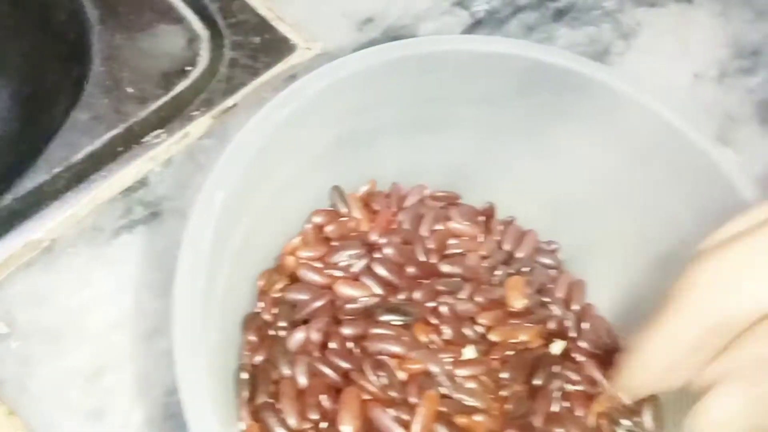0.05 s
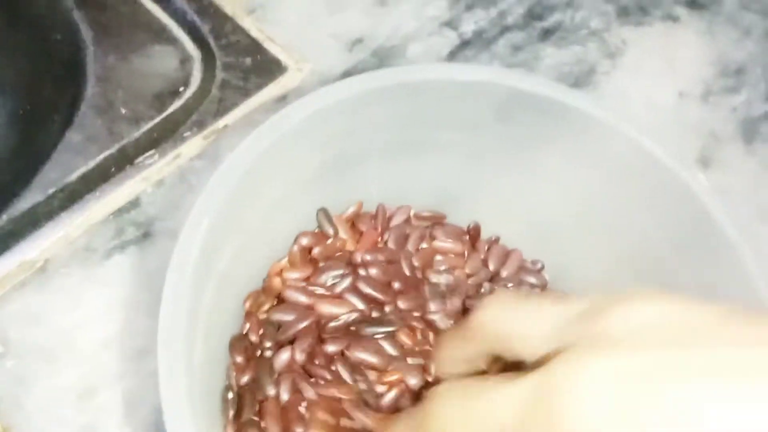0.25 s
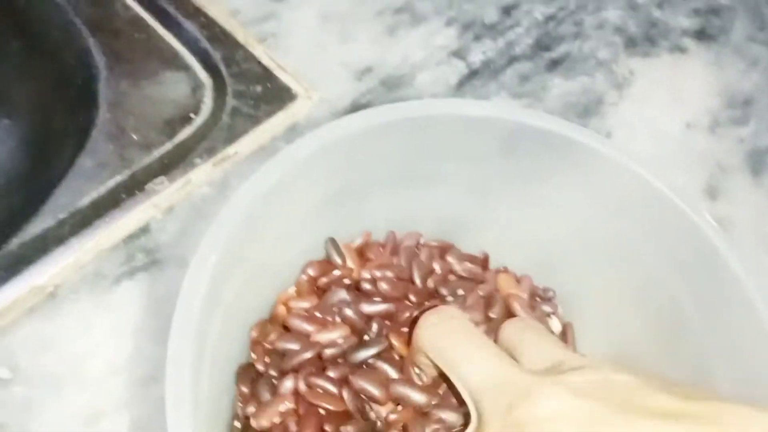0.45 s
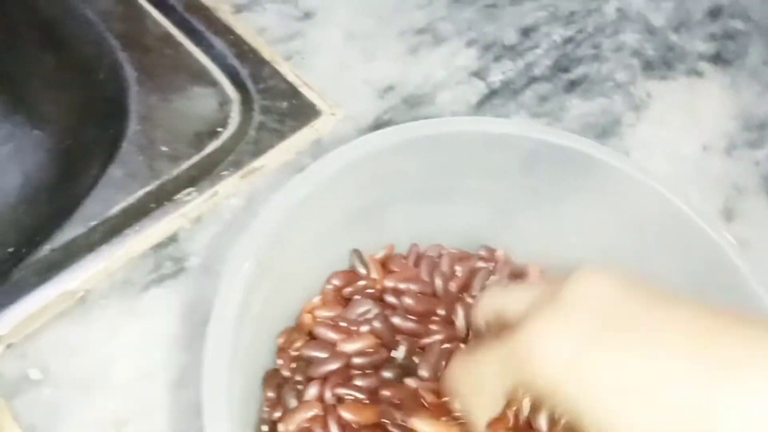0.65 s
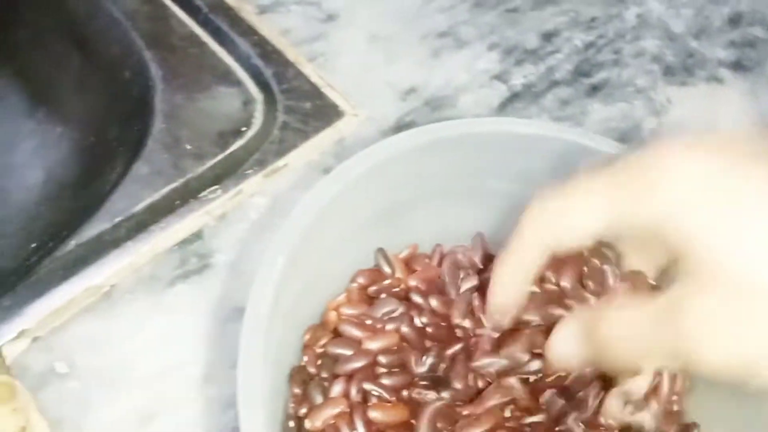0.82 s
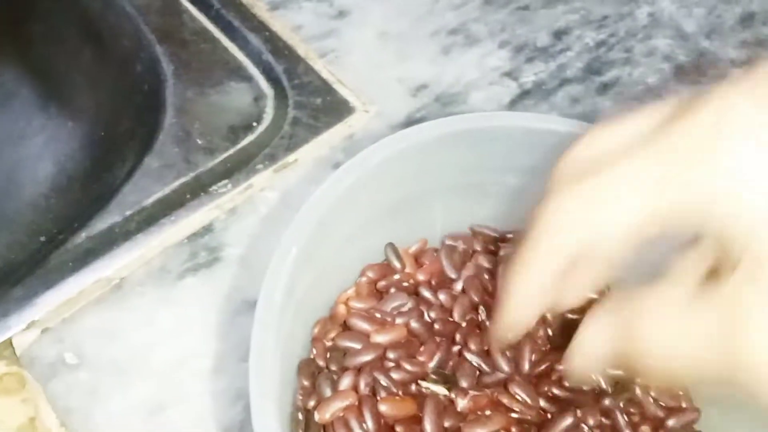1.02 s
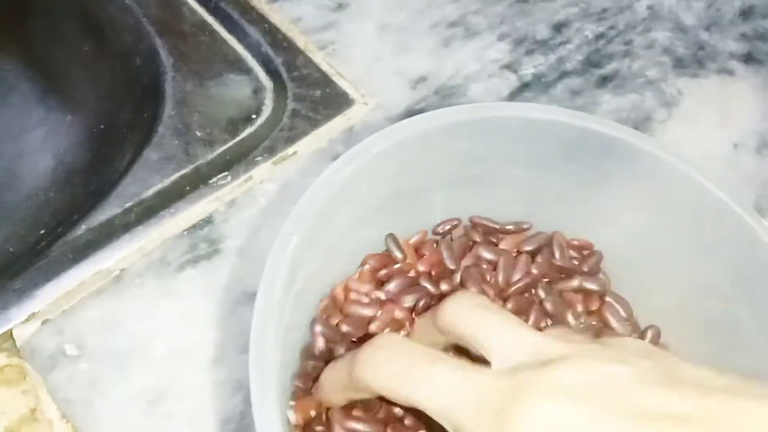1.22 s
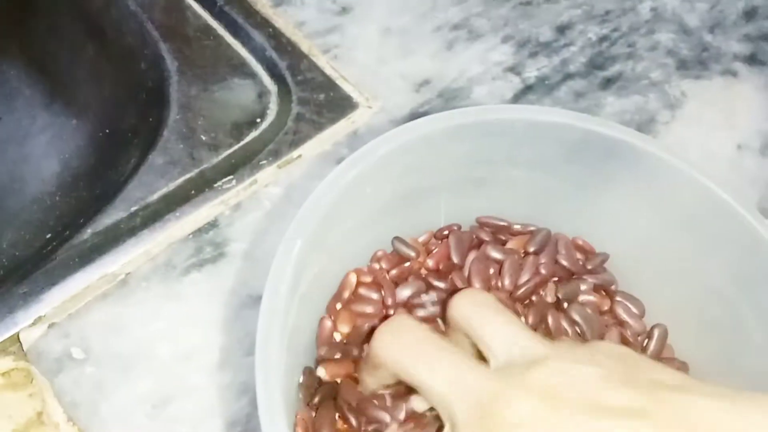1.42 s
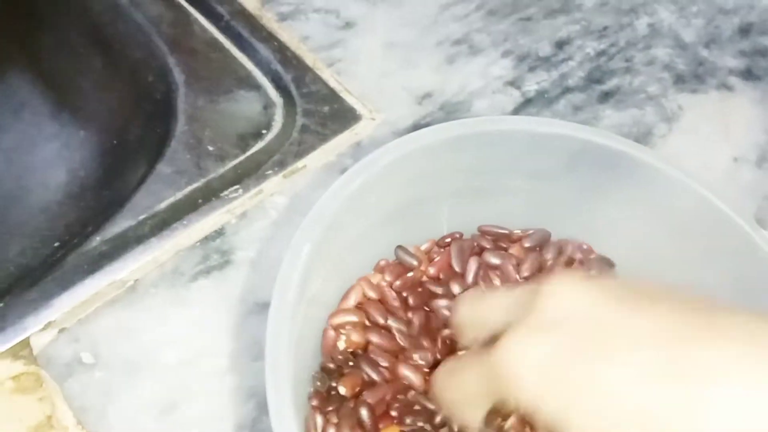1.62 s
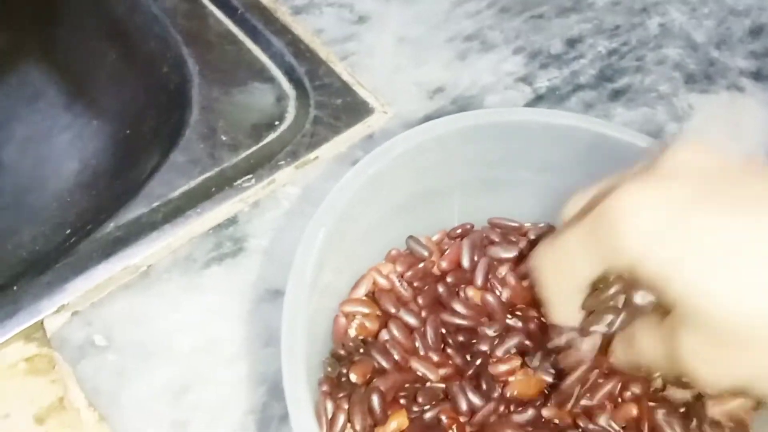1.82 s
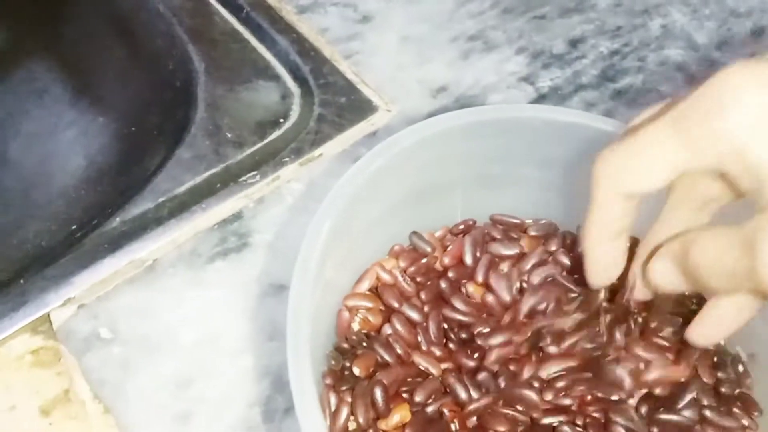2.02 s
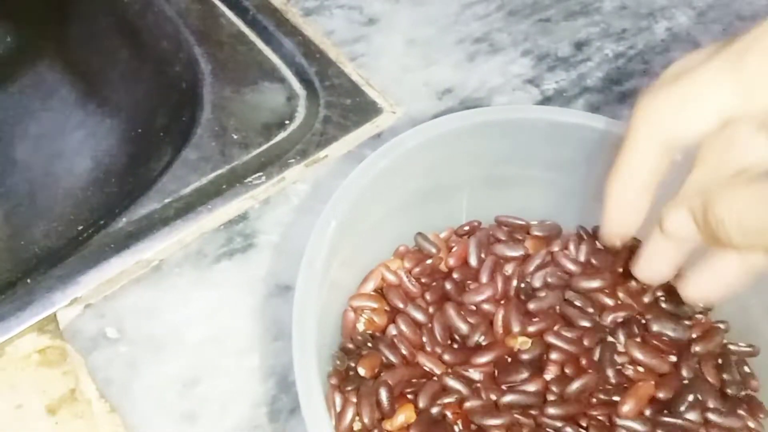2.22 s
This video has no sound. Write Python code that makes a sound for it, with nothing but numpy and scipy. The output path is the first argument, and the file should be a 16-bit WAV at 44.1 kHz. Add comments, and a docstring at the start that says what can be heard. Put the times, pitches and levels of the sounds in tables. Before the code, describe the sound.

Dry beans rattle and clack as a hand stirs them twice round a plastic bowl.

```python
"""Dry beans, stirred by hand twice round a plastic bowl on a stone counter; quiet kitchen, one close mic.
Each contact knocks the bowl wall, rings a bean in two short modes and adds a sharp tick of its skin.
Hundreds of small contacts make the rattle, single hard clacks stand out, and the bowl rumbles softly
on the counter. Behind them are hiss, a low hum, a faint high ring and the short tail of the room."""
import sys
import numpy as np
from scipy import signal
from scipy.fft import rfft, irfft
from scipy.io import wavfile
from scipy.ndimage import uniform_filter1d

SR = 44100
rng = np.random.default_rng(int(sys.argv[2]) if len(sys.argv) > 2 else 0)


def inscribe(sig):
    """Save sig as 16-bit PCM at rate SR to the path in sys.argv[1].

    A 1-D sig is mono; a 2-D sig holds one channel per row.
    Samples are clipped to [-1, 1] before scaling.
    """
    pcm = np.round(np.clip(np.atleast_2d(sig).T, -1, 1) * 32767)
    wavfile.write(sys.argv[1], SR, pcm.astype(np.int16))


N = 103635
TIME = np.arange(N) / SR
RING_T60_S = 0.75

# Tone of the bean bodies and of their skins: frequency_hz, gain_db
BEAN_TONE = [(900, -31), (1900, -7.5), (2400, -3.5), (3200, 0.5), (4100, -2), (5200, 1), (6800, -0.5),
             (8200, -8.5), (11000, -45), (16000, -39)]
SKIN_TONE = [(4000, -21), (7500, 4), (9000, -0.5), (12000, -1), (15000, 1), (16000, 3.5)]
# Bands of the faint high ring: pitch_hz, width_hz, gain_db
RING_BANDS = [(1174, 61, -9.5), (1414, 61, -6.5), (2315, 97, 3), (2580, 27, -4), (2900, 96, -3),
              (3290, 120, -17), (3630, 180, -8), (5030, 180, -9), (5510, 190, -7), (6860, 400, -15.5),
              (7700, 300, -20)]


def from_db(db):
    """Decibels to gain."""
    return 10 ** (np.asarray(db) / 20)


def rms_one(x):
    """Scale to rms 1."""
    return x / np.sqrt(np.mean(x ** 2) + 1e-20)


def unit_energy(x):
    """Scale to energy 1."""
    return x / np.sqrt(np.sum(x ** 2) + 1e-20)


def in_time(rows):
    """Each column of a timed curve at every sample."""
    times, *columns = np.transpose(rows)
    return [np.interp(TIME, times, column) for column in columns]


def add(out, start_s, sound):
    """Mix a short sound in at start_s."""
    i = int(start_s * SR)
    out[i:i + len(sound)] += sound[:N - i]


def coloured(x, points, size=4096):
    """Minimum-phase filter through (frequency_hz, gain_db) points."""
    hz, db = np.transpose(points)
    grid_hz = np.maximum(np.arange(size // 2 + 1) * SR / size, 1)
    gain = from_db(np.interp(np.log(grid_hz), np.log(hz), db))
    cepstrum = irfft(np.log(gain))
    cepstrum[1:size // 2] *= 2
    cepstrum[size // 2 + 1:] = 0
    return signal.oaconvolve(x, irfft(np.exp(rfft(cepstrum))))[:len(x)]


def evened(x, window_s=0.056):
    """Hold the running level near 1, keeping the single contacts."""
    width = int(window_s * SR)
    power = uniform_filter1d(uniform_filter1d(x ** 2, width), width)
    return x / np.sqrt(np.abs(power) + np.mean(x ** 2) / 1000)


def background(hum_hz=196, settle=2048):
    """Room hiss, a low hum and a faint ring that dies away at the start."""
    # Tone of the hiss: frequency_hz, gain_db
    hiss_tone = [(30, -20), (200, -11), (600, -20), (2500, -14), (6000, -24), (9000, -21), (16000, -32)]
    ring = np.zeros(N)
    for hz, width_hz, db in RING_BANDS:
        b, a = signal.iirpeak(hz, hz / width_hz, fs=SR)
        noise = rng.standard_normal(N + settle)
        ring += from_db(db) * signal.lfilter(b, a, signal.lfilter(b, a, noise))[settle:]
    hiss = from_db(-65) * rms_one(coloured(rng.standard_normal(N), hiss_tone))
    hum = from_db(-58) * np.sin(2 * np.pi * hum_hz * TIME)
    return hiss + hum + rms_one(ring) * from_db(-51.5 - 60 * TIME / RING_T60_S)


def counter():
    """The bowl rumbles softly as it shifts on the stone."""
    # The bowl shifting on the counter: time_s, relative_db
    shifts = [(0.0, -45.5), (0.03, -64), (0.32, -46.5), (0.44, -67), (0.49, -54), (0.7, -77), (0.74, -41.5),
              (0.84, -61), (0.86, -51), (0.97, -66), (1.05, -44), (1.09, -75), (1.16, -44), (1.41, -47.5),
              (1.45, -36), (1.5, -66), (1.85, -39), (1.92, -57), (2.06, -34), (2.2, -49.5), (2.24, -33),
              (2.35, -54)]
    # Tone of the rumble: frequency_hz, gain_db
    rumble_tone = [(25, -33), (70, -16.5), (95, 3), (118, 2), (150, -13), (250, -17.5), (600, -40)]
    shift_db, = in_time(shifts)
    return from_db(shift_db - 1) * evened(coloured(rng.standard_normal(N), rumble_tone))


def contact(hz, cycles, rebound_db, scatter_s=0.0071):
    """One touch: a sine falling 60 dB over `cycles`, repeated by rebounds and reflections in the bowl."""
    t = TIME[:1024]
    rebounds = rng.standard_normal(len(t)) * np.exp(-(t / scatter_s) ** 2)
    strikes = from_db(rebound_db) * unit_energy(rebounds)
    strikes[0] += 1  # the first touch
    ring = np.sin(2 * np.pi * hz * t) * from_db(-60 * t * hz / cycles)
    return unit_energy(signal.fftconvolve(ring, strikes)[:len(t)])


def patter(clicks, low_hz, high_hz, cycles, spread_db=3, count=80):
    """Each click excites one of many resonances in a range of pitch, with a strength of its own."""
    dealt = rng.integers(0, count, N)
    clicks = clicks * from_db(spread_db * np.clip(rng.standard_normal(N), -2, 2))
    rings = [contact(hz, cycles, rebound_db=0.5) for hz in np.linspace(low_hz, high_hz, count)]
    out = np.zeros(N)
    for i in np.flatnonzero(clicks):
        add(out, i / SR, clicks[i] * rings[dealt[i]])
    return out


def bowl(knocks):
    """The plastic wall: a broad dull knock and the longer rings of its modes."""
    # Modes of the wall: pitch_hz, width_hz, gain_db
    wall_modes = [(690, 14, 8.5), (814, 14, 0), (892, 28, 2), (985, 26, -5), (1230, 84, -3), (1415, 26, -1),
                  (1550, 38, -5.5), (1808, 26, -1.5)]
    # Tone of the wall: frequency_hz, gain_db
    wall_tone = [(120, -47.5), (350, -28), (600, -9.5), (750, -9), (1000, -2.5), (1300, 2.5), (1600, 1),
                 (2000, 1), (2600, -2), (5000, -44.5)]
    rings = sum(from_db(db) * signal.lfilter(*signal.iirpeak(hz, hz / width_hz, fs=SR), knocks)
                for hz, width_hz, db in wall_modes)
    return coloured(knocks + from_db(-2) * rings, wall_tone)


def rattle(start_s=0.148, peak_contacts_per_s=1800, rate_follows=0.4):
    """Random contacts among the beans, more frequent and stronger as the hand moves faster."""
    # Relative levels through the stir: time_s, shuffle_db, knock_db, clack_db, tick_db
    stir = [(0.15, -65, -41.5, -39, -52), (0.17, -50, -36.5, -37.5, -47), (0.2, -39.5, -33, -35, -44),
            (0.23, -37, -29.5, -22, -38), (0.26, -41, -21.5, -22, -35), (0.31, -33.5, -25, -21, -34.5),
            (0.35, -37, -22.5, -20.5, -37.5), (0.38, -43.5, -29, -28.5, -45), (0.44, -37, -26, -26, -42.5),
            (0.48, -33.5, -16.5, -16.5, -33), (0.52, -36, -19.5, -18.5, -36.5),
            (0.56, -31, -15.5, -14, -29.5), (0.6, -31, -13, -11.5, -29), (0.65, -29, -16, -16, -33),
            (0.7, -36, -19, -15.5, -32.5), (0.78, -33.5, -22, -19, -32), (0.86, -30.5, -21.5, -19.5, -25.5),
            (0.92, -36, -28.5, -21.5, -31.5), (0.96, -37.5, -28.5, -22.5, -35),
            (1.0, -45, -31.5, -30, -41.5), (1.04, -49, -39.5, -37, -54), (1.09, -69, -44, -40, -58),
            (1.12, -68, -58, -40, -72), (1.15, -48, -34, -36, -42), (1.17, -36, -23, -15.5, -35.5),
            (1.24, -30.5, -22, -19.5, -35.5), (1.29, -40, -18.5, -14.5, -32), (1.32, -38, -31, -27.5, -44),
            (1.36, -53, -29.5, -27.5, -49), (1.41, -37.5, -27, -24.5, -36.5),
            (1.45, -36.5, -21, -15.5, -30.5), (1.52, -37, -18, -17, -34.5), (1.6, -38, -16.5, -18, -34.5),
            (1.66, -32.5, -23, -23.5, -40), (1.76, -34.5, -21, -22.5, -33), (1.82, -32, -26, -21, -38),
            (1.9, -35.5, -25, -17, -32.5), (2.0, -35, -30, -22, -26), (2.05, -37.5, -32, -27, -32),
            (2.11, -47.5, -35, -31.5, -35.5), (2.15, -38, -30.5, -26.5, -39), (2.2, -44.5, -42, -38.5, -57),
            (2.26, -43, -44.5, -57, -54.5), (2.34, -47, -54, -85, -87)]
    # Tone of the dull shuffle under the fingers: frequency_hz, gain_db
    shuffle_tone = [(120, -30), (260, -21), (340, 0.5), (420, -0.5), (520, 1.5), (680, 3), (850, 4),
                    (1400, -37.5)]
    shuffle_db, knock_db, clack_db, tick_db = in_time(stir)
    contacts_per_s = peak_contacts_per_s * from_db(rate_follows * (clack_db - clack_db.max()))
    touches = rng.random(N) < contacts_per_s / SR
    strength = from_db(2.5 * np.minimum(rng.exponential(1, N), 4))
    clicks = touches * strength * rng.choice([-1, 1], N)
    shuffle = coloured(patter(clicks, 314, 790, cycles=4.7), shuffle_tone)
    knocks = bowl(patter(clicks, 680, 2260, cycles=6.5))
    low_mode = patter(clicks, 2160, 3840, cycles=11)
    high_mode = patter(clicks, 4420, 7190, cycles=11)
    clacks = coloured(low_mode + from_db(0.5) * high_mode, BEAN_TONE)
    ticks = coloured(patter(clicks, 7800, 16800, cycles=10, spread_db=2.5), SKIN_TONE)
    parts = [(shuffle, shuffle_db), (knocks, knock_db - 1.32),
             (clacks, clack_db - 1.18), (ticks, tick_db + 2)]
    onset = np.clip((TIME - start_s) / .005, 0, 1)  # the fingers reach the beans
    return onset * sum(from_db(db) * evened(part) for part, db in parts)


def hard_clacks(cycles=13.6, pair_split=0.055, tick_hz=11600, lag_s=0.001017):
    """Single beans spring free and strike the wall or each other; skins snap past one another."""
    # Hard hits, levels relative; low and high are the bean's two modes: time_s, level_db,
    # knock_db, low_db, high_db, tick_db, knock_hz, low_hz, high_hz, rebound_db
    hits = [(0.281, -0.5, -18, -17.5, -12, -35, 1600, 3160, 5000, -5),
            (0.3345, -4, -14.5, -18.5, -16, -40, 1610, 2880, 4870, 7),
            (0.346, -9.5, -31, -12, -11, -35, 1470, 3030, 4900, 0),
            (0.403, -8.5, -11, -13, -16, -24, 1260, 2590, 5500, 7),
            (0.4723, -3.5, -3, -19, -24, -34, 1410, 3640, 5070, 0),
            (0.4857, -4, -3, -10, -7.5, -22, 1420, 3510, 4530, 5),
            (0.4961, 0, -7.5, -8.5, -10, -33, 1220, 2220, 5050, 8),
            (0.5463, 0.5, -12, -16, -13.5, -37, 1570, 2820, 4600, -1),
            (0.5881, 0.5, -5, -19, -15, -26, 1610, 2950, 6300, 2),
            (0.6102, -0.5, -7.5, -11, -15, -32, 1820, 2170, 6260, -3),
            (0.6419, -2, -10, -9.5, -15, -27, 1600, 3160, 4950, 6.5),
            (0.7276, -2, -22, -10, -9.5, -22, 1850, 3060, 5530, 0),
            (0.7453, -4, -6, -21, -34, -32, 1210, 2840, 5670, -6),
            (0.8006, -4.5, -8, -6.5, -11, -32, 1770, 3300, 5700, 6),
            (0.8068, 2, -12.5, -24, -12.5, -24, 1440, 2770, 7100, -3),
            (0.8336, -4, -34, -21, -10.5, -16, 1460, 3070, 6030, 1),
            (0.8976, -0.5, -21, -9.5, -12, -26, 1880, 2800, 5560, 2),
            (0.9025, -6, -23, -4, -7.5, -20, 1390, 2950, 5600, 16),
            (0.9118, 0, -12, -15, -15, -23, 1820, 2690, 5740, -2),
            (1.0059, -5.5, -34, -9, -14, -30, 1270, 2860, 5700, -2),
            (1.059, -3.5, -15.5, -15.5, -13, -32, 1830, 3050, 5600, -1.5),
            (1.1252, -24.5, -11, -5.5, -3.5, -31, 1900, 2960, 6030, -4),
            (1.1602, -2.5, -17, -12, -17.5, -34, 1990, 2840, 5300, 4),
            (1.185, -3.5, -23, -9.5, -18, -26, 1440, 3260, 5740, 1),
            (1.2099, -1.5, -21, -9.5, -10, -28, 1340, 2720, 5350, -4),
            (1.273, 0.5, -15.5, -27, -8.5, -28, 1320, 3700, 5840, 2),
            (1.29, 0.5, -13.5, -22, -13.5, -37, 1260, 3030, 5460, -1),
            (1.3282, 5.5, -18.5, -21, -27, -35.5, 1330, 3270, 5450, 3),
            (1.4264, 1, -13.5, -13.5, -20, -36, 1490, 2120, 5480, -1),
            (1.4323, -0.5, -28, -22, -13.5, -17, 1230, 2250, 5830, -7),
            (1.482, 3, -15.5, -16, -13.5, -38, 1260, 2280, 5600, -10),
            (1.493, -8, -18, -30, -9.5, -27, 1330, 3560, 5750, -2),
            (1.516, -1, -6.5, -33, -13.5, -30, 1230, 3480, 4770, -5),
            (1.5799, -1.5, -6, -16, -15, -36, 1300, 2620, 4700, 4),
            (1.6225, -4.5, -7, -20.5, -25, -35, 1210, 3540, 5940, -13),
            (1.6289, -5.5, -15, -10, -17, -35, 1550, 2900, 5560, 0),
            (1.6507, -3, -13, -18, -11.5, -28.5, 1200, 3530, 5400, -5),
            (1.7045, -9, -3.5, -15, -15, -20, 1440, 3300, 4800, -9),
            (1.7393, -3, -8.5, -18, -12, -21, 1396, 3600, 5640, -6),
            (1.7933, -8.5, -4.5, -4.5, -6, -16, 1330, 3400, 5640, 7),
            (1.813, -1.5, -9, -11.5, -12, -41, 1320, 2380, 5500, 2),
            (1.8511, -1.5, -15.5, -16, -9.5, -19, 1350, 3470, 5700, 5),
            (1.9104, -4, -11.5, -11, -27, -26, 1410, 3650, 5950, 1),
            (1.936, -5.5, -28, -9, -15, -30, 1460, 3180, 5360, 7),
            (2.002, -8.5, -30, -12, -9.5, -26, 1230, 2870, 6000, -2),
            (2.065, -15, -8, -23, -6, -24, 1390, 2810, 6860, -5),
            (2.1449, -15, -38, -8, -21, -15, 1200, 2940, 5570, 3)]
    # Skin snaps: time_s, relative_db, pitch_hz
    snaps = [(0.2528, -13, 8100), (0.3167, -21, 15400), (0.395, -17.5, 10600), (0.7767, -7.5, 10200),
             (0.8535, -4, 8100), (0.8708, 4.5, 13400), (0.9304, -12, 14400), (1.1368, -24, 8600),
             (1.684, -10, 12600), (1.753, -5, 14200), (1.8637, -3, 13800), (1.898, 2, 15100),
             (1.9458, 2, 13500), (1.9624, -9, 14000), (1.9847, -6, 10300), (2.017, -6, 10200),
             (2.024, 1, 14200), (2.0548, -7, 12100), (2.083, -11, 8430), (2.108, -13.5, 8600),
             (2.137, -14, 14200), (2.165, -17.5, 8330), (2.2099, -29, 8100)]
    knocks, clacks, ticks = np.zeros((3, N))
    for time_s, db, knock_db, low_db, high_db, tick_db, knock_hz, low_hz, high_hz, rebound_db in hits:
        start_s = time_s + lag_s
        wall_db, bean_db = db + 16.5, db + 24
        add(knocks, start_s, from_db(wall_db + knock_db) * contact(knock_hz, cycles, rebound_db))
        # Two colliding beans ring just below and above their common pitch.
        pair = sum(contact(low_hz * (1 + side * pair_split), cycles, rebound_db) for side in (-1, 1))
        add(clacks, start_s, from_db(bean_db + low_db) * unit_energy(pair))
        add(clacks, start_s, from_db(bean_db + high_db) * contact(high_hz, cycles, rebound_db))
        tick = contact(tick_hz, cycles=2, rebound_db=rebound_db)
        add(ticks, start_s, from_db(bean_db + tick_db) * tick)
    for time_s, db, hz in snaps:
        add(ticks, time_s + lag_s, from_db(db + 9.5) * contact(hz, cycles=4.6, rebound_db=-6.5))
    return bowl(knocks) + coloured(clacks, BEAN_TONE) + coloured(ticks, SKIN_TONE)


def kitchen(beans, t60_s=0.29, delay_s=0.0058, level_db=-14):
    """A short diffuse tail from the hard walls, well under the close sound."""
    # Tone of the reflections: frequency_hz, gain_db
    tail_tone = [(200, 8.5), (1300, 4.5), (2800, 0.5), (3500, 3), (4400, -1), (5500, 1.5), (7000, -1.5),
                 (15000, -1.5)]
    t = TIME[:SR // 2]
    tail = rng.standard_normal(len(t)) * from_db(-60 * t / t60_s) * (t > delay_s)
    return from_db(level_db) * signal.fftconvolve(beans, unit_energy(coloured(tail, tail_tone)))[:N]


def lingering_ring(beans, gain_db=-7):
    """A faint high ring lingers after the clacks."""
    width_hz = np.log(1000) / (np.pi * RING_T60_S)
    bands = [signal.iirpeak(hz, hz / width_hz, fs=SR) for hz, _, _ in RING_BANDS]
    return from_db(gain_db) * sum(signal.lfilter(b, a, beans) for b, a in bands)


def thuds_and_cracks():
    """Dull low thuds and sharp cracks with the loudest clacks."""
    # Thuds: start_s, relative_db
    thuds = [(0.588, -12), (0.899, -17), (1.33, -3.5), (1.6516, -3)]
    # Tones of thud and crack: frequency_hz, gain_db
    thud_tone = [(20, -4), (60, -12), (200, 1), (400, -14), (1000, -40)]
    crack_tone = [(200, -15), (1200, 12), (6000, 2.5), (9000, -6)]
    impulses = np.zeros(N)
    for start_s, db in thuds:
        add(impulses, start_s, from_db([db + 11]))
    return coloured(impulses, thud_tone) + coloured(impulses, crack_tone)


def scene():
    """Beans, bowl and room at one close microphone."""
    beans = rattle() + hard_clacks()
    return (beans + kitchen(beans) + lingering_ring(beans)
            + counter() + thuds_and_cracks() + background())[None]


def record(dry):
    """The loudest peaks are rounded and the top treble is cut."""
    overload, cutoff_hz = 0.9, 15500
    rounded = dry / (1 + (dry / overload) ** 4) ** .25
    return signal.sosfilt(signal.ellip(12, .1, 80, cutoff_hz, fs=SR, output="sos"), rounded)


dry = scene()
out = record(dry)
inscribe(out)
```